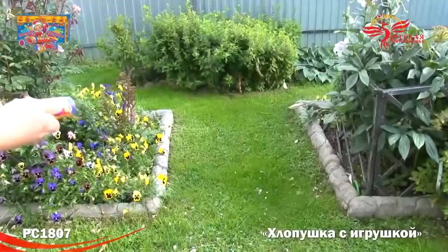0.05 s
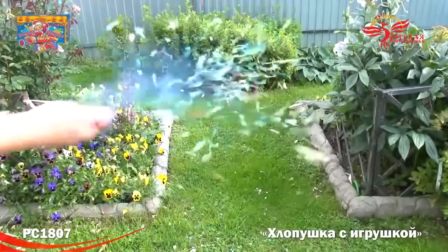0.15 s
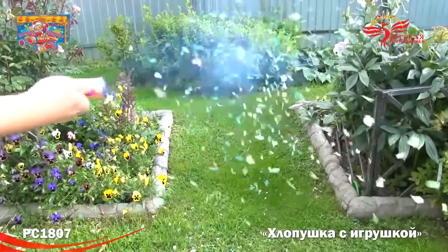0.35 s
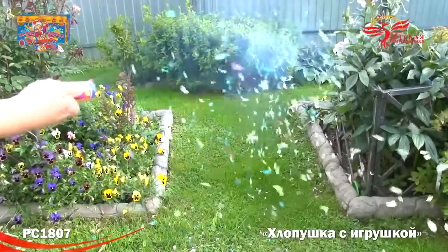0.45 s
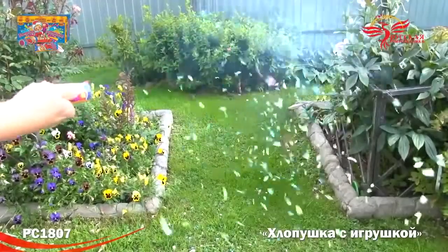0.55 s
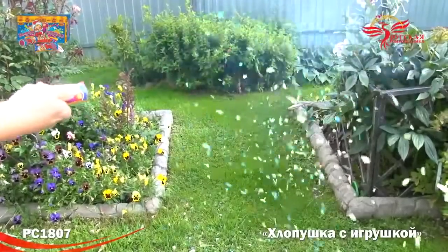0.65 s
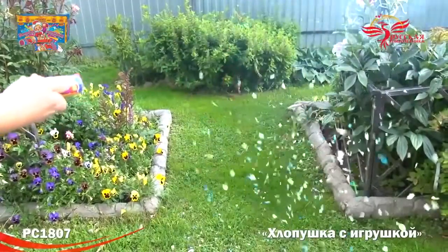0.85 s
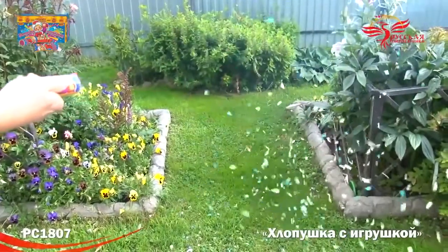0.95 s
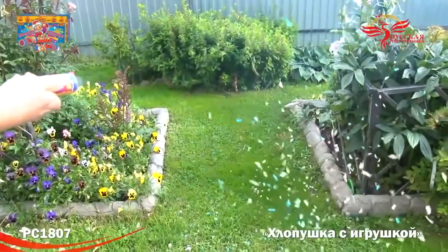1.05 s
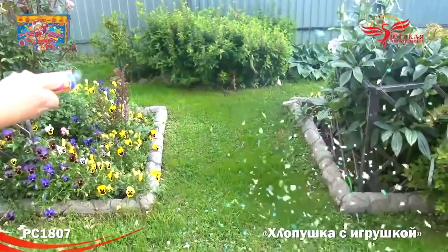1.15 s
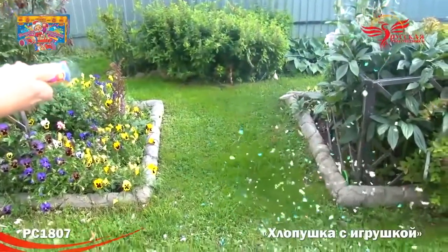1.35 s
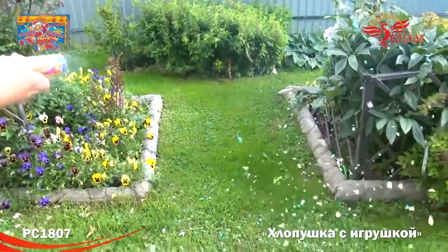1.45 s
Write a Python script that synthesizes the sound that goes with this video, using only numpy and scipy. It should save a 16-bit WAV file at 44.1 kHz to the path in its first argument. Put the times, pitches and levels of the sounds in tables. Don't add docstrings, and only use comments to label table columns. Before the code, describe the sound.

One sharp overloaded popper bang close by outdoors, with clattering metallic echoes and a short ringing tail

```python
import sys
import numpy as np
from scipy import signal
from scipy.fft import rfft, irfft, next_fast_len
from scipy.io import wavfile
from scipy.ndimage import uniform_filter1d, map_coordinates

SR = 44100
rng = np.random.default_rng(int(sys.argv[2]) if len(sys.argv) > 2 else 0)


def to_wav(sig):
    pcm = np.clip(np.atleast_2d(sig), -1, 1) * 32767
    pcm = np.round(pcm).astype(np.int16)
    wavfile.write(sys.argv[1], SR, pcm.T)


def elevation(decibels):
    levels = np.asarray(decibels, float)
    return 10 ** (levels / 20)


N = 66150
T = np.arange(N) / SR
BANG_S = .2315

# f/Hz, density/dB
TRAFFIC_COLOUR = [(15, -63.5), (25, -31.5), (65, -11.5), (275, -14.5), (325, -14), (353, -11.5), (669, -2),
                  (1530, -7.5), (3500, -26), (4550, -54), (7700, -120)]
# t/s, level/dB
TRAFFIC_SWELL = [(0, -44), (.7, -42.5), (1.5, -41.5)]
# f/Hz, density/dB
INSECT_COLOUR = [(3500, -7), (4800, -8.5), (6000, -16), (7300, -9), (8400, -2), (10200, -10), (12300, -20),
                 (15400, -25)]
# t/s, peak level/dB
FLAKE_TICKS = [(0.5157, -56), (0.5254, -79), (0.7372, -56), (0.7554, -59), (0.9764, -62.5), (1.065, -38),
               (1.0732, -62), (1.2455, -60), (1.3083, -62.5), (1.4611, -56.5), (1.4814, -54.5),
               (1.4944, -73.5)]
# f/Hz, level/dB
PAPER_COLOUR = [(1500, -7.5), (4500, -12.5), (8000, -9), (12000, -5), (16000, -10)]
# f/Hz, level/dB
NEAR_COLOUR = [(60, -19), (250, 4.5), (700, -1.5), (1600, -4.5), (2600, -4.5), (4500, -2), (8000, -10),
               (15000, -7.5)]
# f/Hz, T60/s
NEAR_DECAY = [(60, .12), (300, 0.2), (800, 0.39), (1600, 0.58), (3000, 0.43), (5000, 0.36), (9000, 0.26),
              (15000, 0.14)]
# f/Hz, level/dB
FAR_COLOUR = [(200, -21), (800, -4), (1400, -4), (1600, 8.5), (1850, -8.5), (4400, -1), (6500, -8.5),
              (12000, -26)]
# f/Hz, T60/s
FAR_DECAY = [(300, 0.98), (1600, .75), (4300, 0.63), (8000, 0.44)]
# t/s, peak level/dB, sheet ring f/Hz, ring over crack level/dB, snap/1
FENCE_ECHOES = [(.2590, 10, 690, -6, 1.5), (.2720, 9, 4400, -12, .5), (.2900, 13, 2400, -11, 1.5),
                (.2955, 11, 4300, -10, .5), (.2970, -12, 190, 6, 3), (.3040, -1, 4600, -12, .5),
                (.3215, 7, 840, 0, 4), (.3285, -4, 1550, -5, .5), (.3520, -.5, 1700, -5, 4),
                (.3870, -15, 1400, -6, 1.2), (.4165, -11, 1620, -5, .3), (.4500, -20, 4500, -12, .3),
                (.4830, -23, 1550, -5, .3), (.5200, -27, 1600, -3, .3)]


def unit(x):
    return x / np.sqrt(np.mean(x ** 2) + 1e-20)


def along(points, hz):
    f, v = np.transpose(points)
    return np.interp(np.log(hz + 1), np.log(f + 1), v, left=v[0], right=v[-1])


def filtered(x, response):
    m = next_fast_len(N + SR // 2)
    spectrum = rfft(x, m) * response(np.fft.rfftfreq(m, 1 / SR))
    return irfft(spectrum, m)[..., :N]


def resonance(hz, width_hz):
    return lambda f: 1j * f * width_hz / (hz * hz - f * f + 1j * f * width_hz)


def wobble(rate):
    return map_coordinates(rng.standard_normal(200), [T * rate])


def burst(s, t60):
    return (T >= s) * elevation(-60 * np.abs(T - s) / t60)


def rush(colour, lo_hz, hi_hz, patchy_db):
    z = signal.stft(rng.standard_normal(N), nperseg=512)[2]
    patches = uniform_filter1d(rng.standard_normal(z.shape), size=6, axis=0)
    patches = uniform_filter1d(patches, size=12, axis=1)
    x = signal.istft(z * elevation(patchy_db * unit(patches)), nperseg=512)[1][:N]
    return unit(filtered(x, lambda f: elevation(along(colour, f)) * (f > lo_hz) * (f < hi_hz)))


def tail(colour, decay):
    hz, t, z = signal.stft(rng.standard_normal(N), SR, nperseg=256)
    loss_db = 60 * np.maximum(t - BANG_S, 0) / along(decay, hz)[:, None]
    gain_db = along(colour, hz)[:, None] - loss_db
    return (T >= BANG_S) * signal.istft(z * elevation(gain_db), SR, nperseg=256)[1][:N]


def background():
    hum_db = np.interp(T, *np.transpose(TRAFFIC_SWELL)) + .7 * wobble(17)
    hiss_db = -57.5 + .8 * wobble(25)
    hiss = elevation(hiss_db) * rush(INSECT_COLOUR, 3500, 17000, patchy_db=.6)
    hum = elevation(hum_db) * rush(TRAFFIC_COLOUR, 20, 3500, patchy_db=.7)
    return hum + hiss


def bump():
    bump_s, length_s, thump_hz = 1.303, .02, 72
    thump = np.exp(-((T - bump_s) / length_s) ** 2) * np.sin(2 * np.pi * thump_hz * (T - bump_s))
    click = filtered(burst(bump_s, 0.022) * rng.standard_normal(N), resonance(4100, 2000))
    return elevation(-35) * thump + elevation(-41) * click


def flakes():
    shape = np.zeros(N)
    for s, db in FLAKE_TICKS:
        rustle = .22 * burst(s, .04)
        snap = burst(s + .001, .0015)
        shape += elevation(db) * (rustle + snap)
    return 1.3 * shape * rush(PAPER_COLOUR, 1500, 17000, patchy_db=3)


def garden():
    build_s, far_rise_s = .004, 0.036
    t = np.abs(T - BANG_S)
    near_gain = elevation(10.5 + 0.8 * wobble(90)) * (1 - 0.24 * np.exp(-t / build_s))
    near = near_gain * tail(NEAR_COLOUR, NEAR_DECAY)
    far_gain = elevation(-2.5 + 1.5 * wobble(40)) * (1 - np.exp(-t / far_rise_s))
    far = far_gain * tail(FAR_COLOUR, FAR_DECAY)
    return near + far


def fences():
    echo_t60, swell_s, ring_q = 0.022, 0.0013, 9
    air_db_per_s = 150
    crack = resonance(3980, 5500)
    out = np.zeros(N)
    for s, db, hz, ring_db, snap in FENCE_ECHOES:
        smear = burst(s, echo_t60) * (1 - np.exp(-np.abs(T - s) / swell_s))
        hit = smear * rng.standard_normal(N) - snap * burst(s, .002)
        ring = resonance(hz, hz / ring_q)

        def sheet(f):
            air = elevation(-air_db_per_s * (s - BANG_S) * (f / 1e4) ** 2)
            return air * (elevation(ring_db + 13) * ring(f) + crack(f) ** 2)

        echo = filtered(hit, sheet)
        out += elevation(db) * echo / np.abs(echo).max()
    return out


def blast():
    push_s, boom_hz, boom_t60 = .0019, 66.4, 0.059
    t = np.abs(T - BANG_S)
    tear = elevation(23.5) * burst(BANG_S + 0.00052, 0.015) * rng.standard_normal(N)
    crack = filtered(tear, resonance(3400, 3300))
    fuse = (T < BANG_S) * elevation(-22 - 30 * t / .0045) * rng.standard_normal(N)
    push = elevation(19) * np.exp(-t / push_s)
    boom = elevation(16.5 - 60 * t / boom_t60) * np.sin(2 * np.pi * boom_hz * t)
    return (T >= BANG_S) * (push - boom) + crack + fuse


def scene():
    return (blast() + garden() + fences() + flakes() + bump() + background())[None]


def saturate(x, top, hard):
    return x / (1 + np.abs(x / top) ** hard) ** (1 / hard)


def band_limit(x):
    return signal.sosfilt(signal.butter(12, 15590, fs=SR, output="sos"), x)


def record(dry):
    bias, sag_hz = .2, 95
    railed = saturate(dry + bias, 1.0, hard=8) - bias
    sagged = filtered(railed, lambda f: 1j * f / (sag_hz + 1j * f))
    mix = saturate(sagged, .9, hard=12)
    return band_limit(mix)


dry = scene()
out = record(dry)
to_wav(out)
```